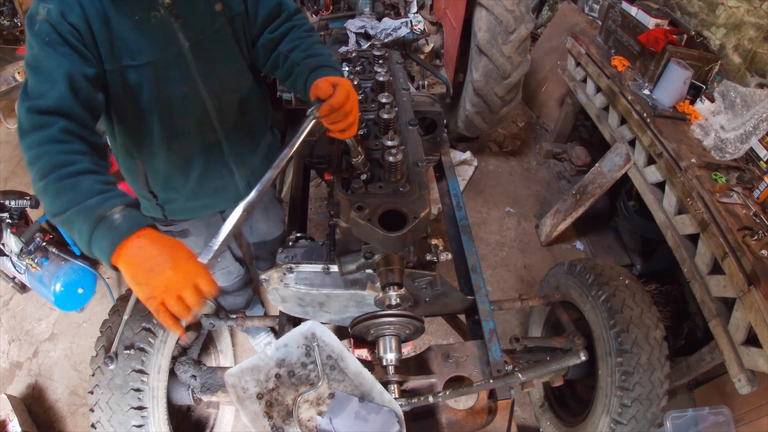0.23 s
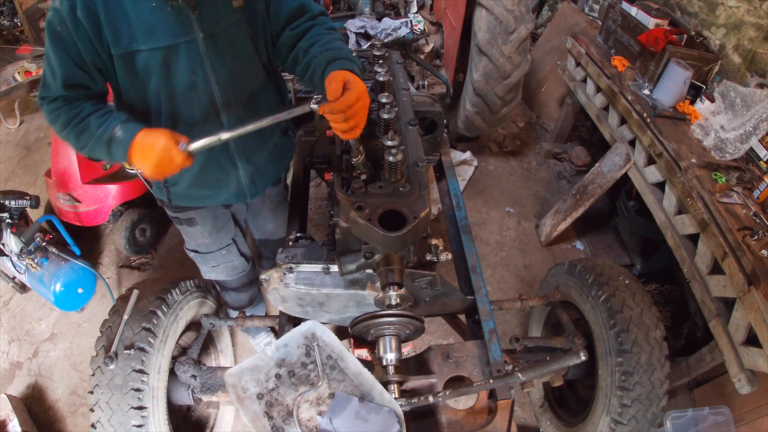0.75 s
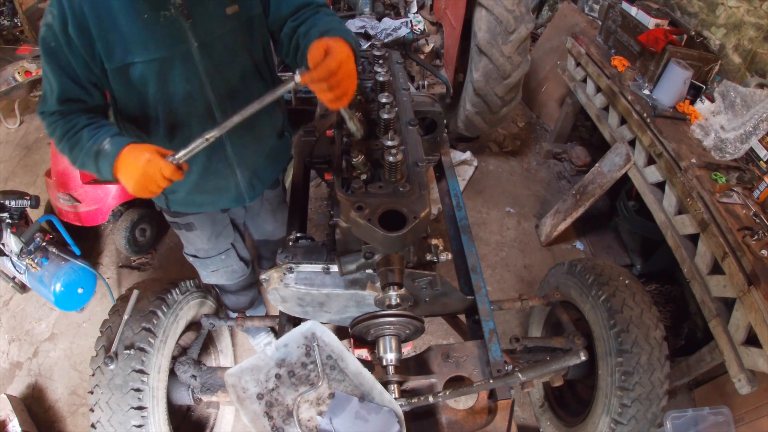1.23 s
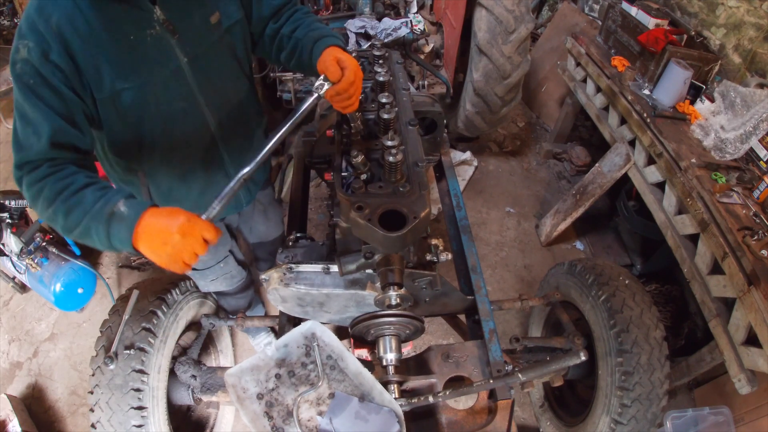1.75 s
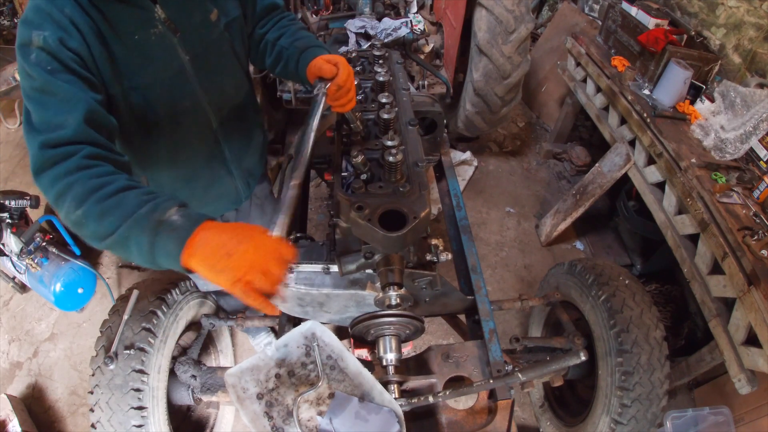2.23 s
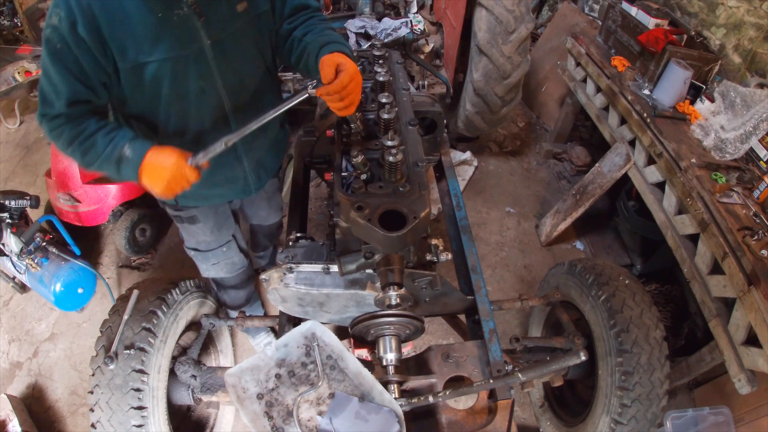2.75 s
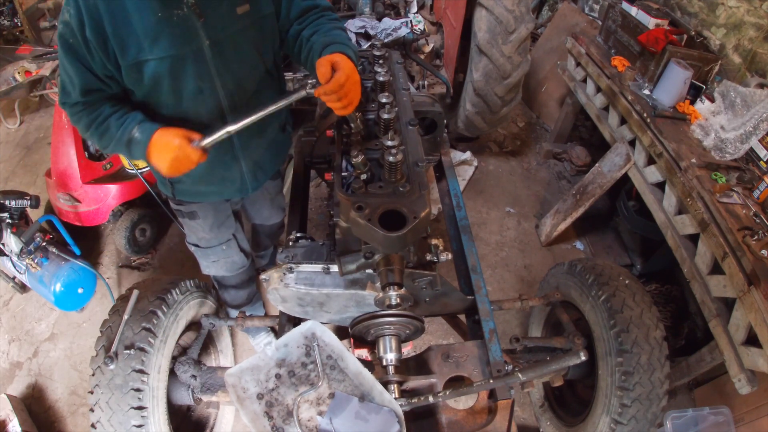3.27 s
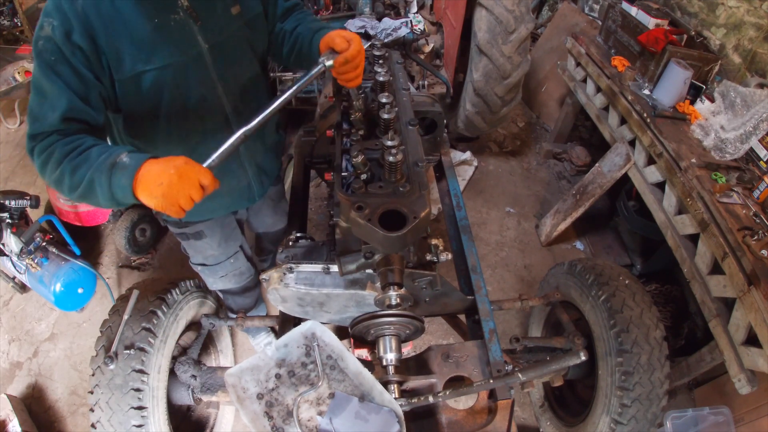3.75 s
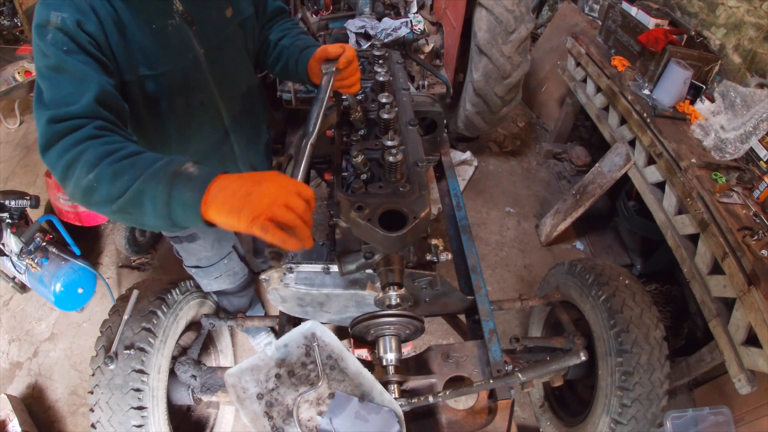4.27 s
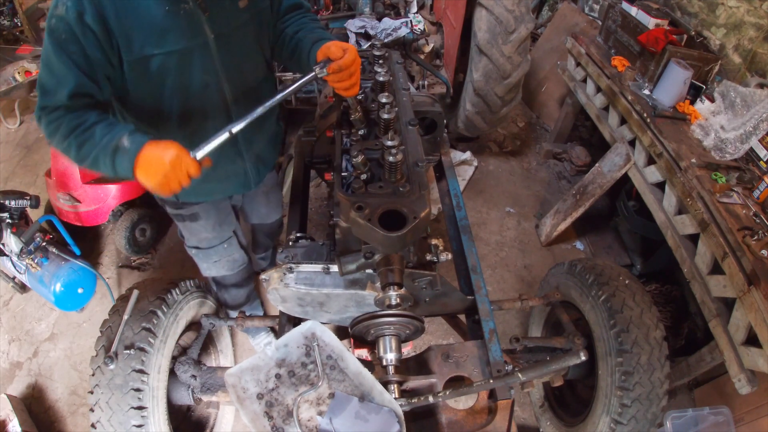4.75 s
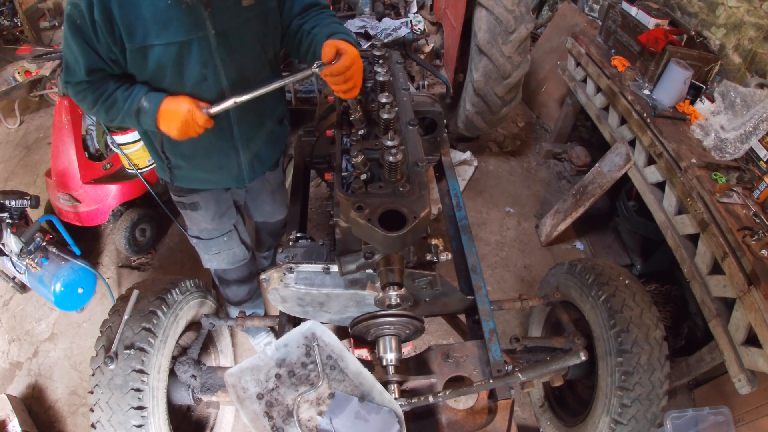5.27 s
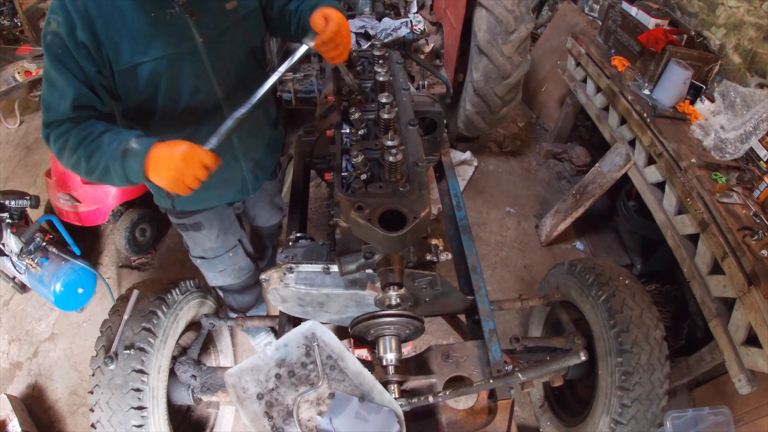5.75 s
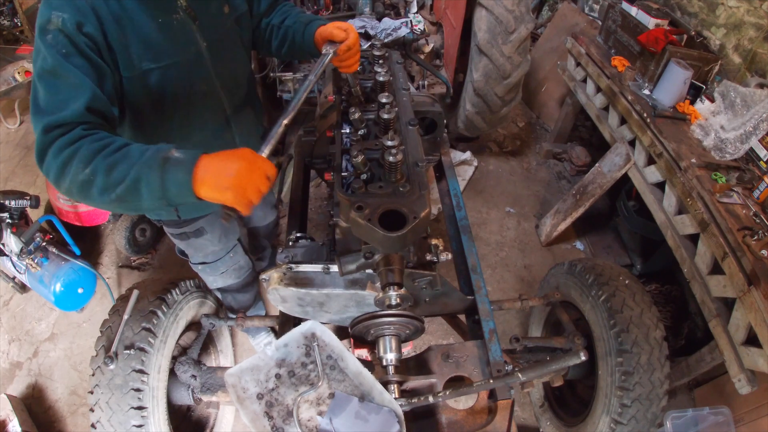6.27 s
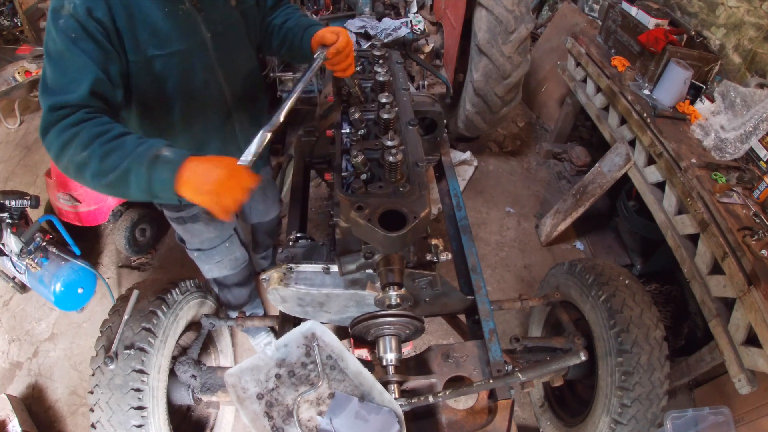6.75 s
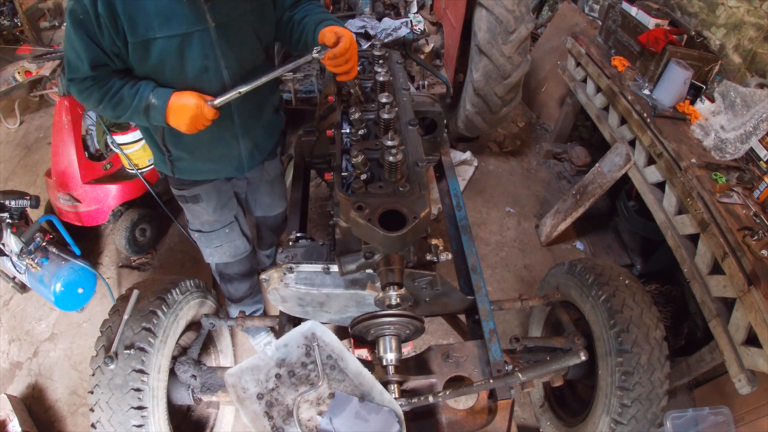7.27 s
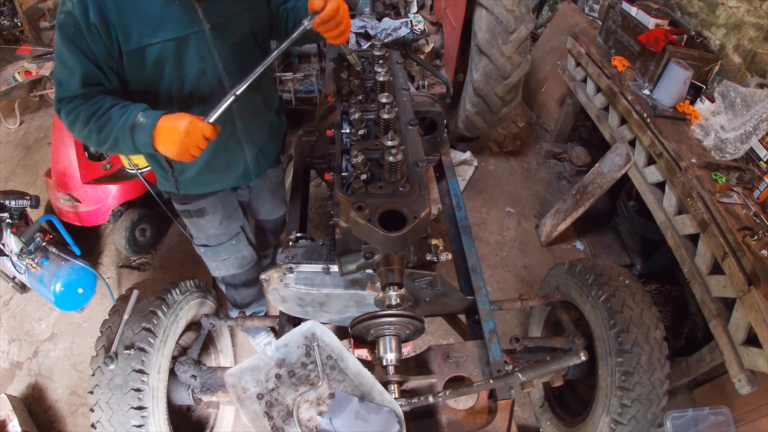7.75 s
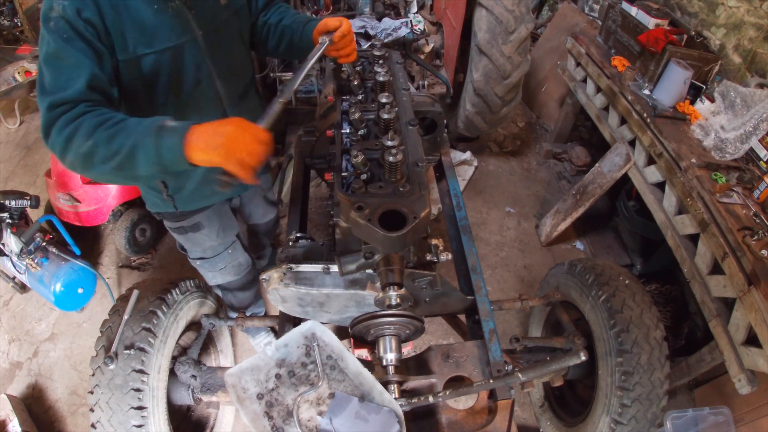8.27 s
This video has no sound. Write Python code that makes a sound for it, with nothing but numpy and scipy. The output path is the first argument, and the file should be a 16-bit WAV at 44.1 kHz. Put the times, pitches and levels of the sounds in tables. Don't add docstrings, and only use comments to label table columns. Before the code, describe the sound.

A ratcheting torque wrench on engine nuts gives hard, irregular steel clicks with short rings and low thumps, over faint shed air and occasional birdsong.

```python
import sys
import numpy as np
from scipy import signal
from scipy.io import wavfile
from scipy.ndimage import uniform_filter1d

SR = 44100
rng = np.random.default_rng(int(sys.argv[2]) if len(sys.argv) > 2 else 0)


def nominal_scale(level):
    x = np.asarray(level, float) / 20
    return 10 ** x


def pcm_store(signal):
    levels = np.round(np.clip(np.atleast_2d(signal), -1, 1) * 32767)
    wavfile.write(sys.argv[1], SR, levels.astype(np.int16).T)


N = 375320


def fade(t, t60):
    return np.exp(-np.log(1000) * np.maximum(t, 0) / t60) * (t >= 0)


def band(x, low_hz, high_hz):
    sos = signal.butter(3, [low_hz, high_hz], "band", fs=SR, output="sos")
    return signal.sosfilt(sos, x) * np.sqrt(SR / 2 / (high_hz - low_hz))


def add(out, start_s, x):
    i = max(int(start_s * SR), 0)
    out[i:i + len(x)] += x[:N - i]


def walk(rate_hz, size=N, sr=SR):
    hold = int(sr / rate_hz)
    steps = np.repeat(rng.standard_normal(size // hold + 1), hold)
    return 1.5 * uniform_filter1d(uniform_filter1d(steps, hold), hold)[:size]


def rough_ring(t, hz, t60, width):
    waver = band(rng.standard_normal(np.shape(hz * t)), 5.8, 60 + width * np.mean(hz))
    return fade(t, t60) * (.5 + waver) * np.sin(2 * np.pi * hz * t)


# start in seconds, 2-5 kHz peak in dB,
# low band in dB re peak, high band in dB re peak, tail in dB re crack.
CLICKS = [(0.0, -19.5, -29, -10.5, -5), (1.6159, -20.5, -14.5, -17, -3), (1.7764, -10.5, -12.5, -1, -9),
          (1.9985, -8, -8.5, 0.4, -7.5), (2.1243, -25.5, -21, -8, -13), (2.157, -9, -31, -12, -16),
          (3.8924, -10, -12, -13, -8), (4.0088, -0.5, -12, -9, -14), (4.14, -10, -6, -1.5, -13),
          (5.8995, -14.5, -4, -14.5, -11), (5.9138, -19.5, -2.5, -19, -16),
          (5.9752, -11.5, -18.5, -10.5, -9), (6.2051, -15, -10.5, -7, -8), (6.2841, -19, -13, -33, -10.5),
          (6.2921, -18, -2.5, -18, -13), (6.518, -26.5, -28, -10, -11), (6.5949, -7.5, -28.5, -14, -14.5),
          (8.08, -24.5, -8, -23, -4.5), (8.1576, -15, -16.5, -16, -4), (8.164, -10, -14.5, -6, -12.5),
          (8.2602, -22, -13, -11, -9), (8.2745, -12.5, -7, -0.5, -11), (8.4467, -5, -28, -13.5, -14.5)]
# start in seconds, peak in dB, low band in dB re peak,
# high band in dB re peak, tail in dB.
SCRAPES = [(0.065, -19, -12, -14, -18), (0.0812, -11, -7, -9.5, -16.5), (0.595, -33.5, -14.5, -15, -4.5),
           (1.129, -23, -14, -11, -7), (2.3544, -31, -12, -17, -25), (3.2695, -22, -9, -5.5, -6.5),
           (3.3288, -33, -2.5, -18, -8), (4.3136, -47, 5, -12, -11), (4.5291, -25.5, -7, -26, -15),
           (5.4505, -23, -7.5, -13, -10.5), (6.131, -30.5, 4, -15, -9), (6.4203, -29, -7, -20, -8),
           (6.4394, -32, 3.5, -16, -11.5), (6.7585, -27, -4, -13.5, -12.5), (7.5587, -25, -8, -8.5, -8),
           (8.3294, -33, -1, -10, -12), (8.3913, -28.5, -3, -15, -10)]
# start in seconds, peak in dB.
TICKS = [
    (0.2528, -39.5),
    (2.368, -40),
    (4.362, -41),
    (4.436, -45),
    (6.1445, -34),
    (6.402, -33),
    (6.697, -40),
    (8.433, -29),
]
# start in seconds, peak in dB.
BRUSHES = [
    (0.3494, -41),
    (0.8344, -45),
    (1.2844, -45),
    (5.5594, -45),
    (7.0494, -43),
    (7.5158, -43),
    (8.0394, -48),
]


def contacts():
    clicks = [(*row, .004) for row in CLICKS]
    scrapes = [(*row, .003 - .0006 * row[1]) for row in SCRAPES]
    ticks = [(*row, -6, -13, -7, .004) for row in TICKS]
    brushes = [(*row, -7, -3, -9, .028) for row in BRUSHES]
    return clicks + scrapes + ticks + brushes


# frequency in Hz, level in dB.
STEEL = [(800, -5), (1350, 15), (1600, 5.5), (2330, 6), (2900, 3), (3470, -0.5), (3750, -2), (4250, -15),
         (5050, 6), (5600, 1), (6400, -8), (7200, 4), (8600, 4.5), (9200, 7.5)]
# low edge in Hz, high edge in Hz, t60 in seconds, level in dB.
SHED_BANDS = [(380, 1000, 0.55, -3.5), (1030, 1980, 0.41, 3.5), (1890, 4610, 0.29, -3),
              (5130, 9440, 0.26, 0), (10200, 14800, 0.2, -5)]


def strikes():
    out, t = np.zeros(N), np.arange(SR // 3) / SR
    mode_hz, mode_db = np.transpose(STEEL)
    steel = rough_ring(np.arange(SR) / SR, mode_hz[:, None], np.inf, .041)
    starts_s, peaks_db, low_db, high_db, tail_db, scrape_s = np.transpose(contacts())[:, :, None]
    scrape_s = np.maximum(scrape_s, .001)
    hardness = np.clip(.006 / scrape_s, 0, 1)

    impact = 2.4 * fade(t, .008) * (1 - fade(t, .004)) + .55 * fade(t, .025)
    floor_bounce = .45 * fade(t - .0085, .02)
    crack = hardness * (impact + floor_bounce)
    chance = rng.random(crack.shape) * SR / 300
    grains = (chance < 1) * chance * 1.3 * fade(t, 5 * scrape_s)
    blows = crack + signal.lfilter([1], [1, -.985], grains)
    build = (1 - fade(t, .0099 + scrape_s)) * np.cos(np.pi / 2 * t / t[-1]) * nominal_scale(tail_db)

    bursts, noise = 0, rng.standard_normal(crack.shape)
    for (low_hz, high_hz, t60, band_db), share_db in zip(SHED_BANDS, (low_db, low_db, 0, high_db, high_db)):
        tail = fade(t, t60 + 2 * scrape_s) * build
        shape = min(low_hz / 900, 1) * blows + tail
        bursts = bursts + nominal_scale(share_db + band_db - 6.5) * band(shape * noise, low_hz, high_hz)

    luck_db = 4 * np.clip(rng.standard_normal((len(peaks_db), len(STEEL))), -2, 1.3)
    low_tilt_db = low_db * np.interp(mode_hz, [1200, 3500], [1, 0])
    high_tilt_db = high_db * np.interp(mode_hz, [3500, 7500], [0, 1])
    gains = hardness * nominal_scale(low_tilt_db + high_tilt_db + mode_db + luck_db + tail_db - 17.5)
    offsets = rng.integers(SR // 2, size=len(peaks_db))
    for start_s, peak_db, burst, gain, k in zip(starts_s[:, 0], peaks_db, bursts, gains, offsets):
        ring = gain @ steel[:, k:k + len(t)] * fade(t, .21)
        add(out, start_s, nominal_scale(peak_db) * (burst + ring))
    return out


# (start in seconds, level in dB).
RINGS = [(560, .15, [(.08, -36)]), (1335, .22, [(1.781, -29), (2.0, -30.5), (5.902, -20.5), (6.206, -32.5),
         (6.292, -35), (6.441, -40), (8.275, -31)]), (1520, .2, [(4.009, -14)]), (2020, .09, [(.085, -28),
         (8.166, -24)]), (2800, .1, [(0, -32), (6.595, -29)]), (3290, .05, [(2.123, -24)]),
         (3740, .16, [(3.891, -21), (5.976, -24.5)]), (4350, .07, [(0, -32), (2.124, -25.5), (5.451, -43)]),
         (5050, .22, [(3.893, -19), (4.009, -26)]), (5650, .23, [(3.895, -20), (4.009, -27)]),
         (6250, .16, [(8.167, -27), (8.273, -26)]), (6970, .25, [(1.777, -27.5), (3.27, -45.5),
         (6.293, -45)]), (7550, .2, [(2.0, -30), (2.16, -38), (3.893, -36), (6.595, -36), (8.446, -30)]),
         (8850, .17, [(1.62, -41), (1.778, -29), (1.999, -22), (4.139, -31.5), (5.974, -21)])]


def singing_parts():
    out, t = np.zeros(N), np.arange(SR // 3) / SR
    for hz, t60, blows in RINGS:
        rings = rough_ring(t, np.full((len(blows), 1), hz), t60, .016 + .001 / t60)
        for (start_s, db), ring in zip(blows, rings):
            add(out, start_s, nominal_scale(db + 1.2) * ring)
    return out


# start in seconds, 90 Hz sway peak in dB, deep sway in dB re peak, panel modes in dB re peak.
JOLTS = [(0.0, -36, -16, -7), (0.059, -13.5, -17, -14.5), (0.089, -9, -12.5, -12.5),
         (0.309, -33, -3.5, -26), (1.128, -39.5, -7.5, -6.5), (1.626, -28.5, -8, -6.5),
         (1.79, -25.5, -16, -4.5), (2.005, -9.5, -25, -11.5), (2.039, -9, -18, -18), (2.109, -19, -29, -17),
         (2.387, -38, 6, -6), (3.27, -21, -13, -14), (3.378, -29, -12, -9), (3.905, -30.5, -6, -2.5),
         (4.02, -28.5, -12, -4.5), (4.139, -21, -9, -10), (4.198, -31, 1, -10), (4.378, -35.5, -4, -6),
         (4.529, -26.5, -2.5, -8.5), (4.649, -34.5, -13, -9), (5.453, -34.5, -14, -8),
         (5.995, -25, -19, -20), (6.129, -30.5, -19, -10), (6.307, -23, -19, -12), (6.41, -33, -6.5, -21),
         (6.778, -32.5, 7, -11), (7.57, -35.5, -13, -5.5), (8.169, -29.5, -11, -4), (8.288, -28, -10, -4.5),
         (6.61, -38, -1, -10)]
# frequency in Hz, level in dB, t60 in seconds, group (0 sway, 1 deep, 2 panel).
FRAME = [(44, 8, 0.41, 1), (60.05, 7, 0.52, 1), (83.5, -7, 0.42, 0), (91.14, 2.5, 0.5, 0),
         (101.6, -10.5, 0.29, 0), (157.3, 2, 0.43, 2), (207.4, -4.5, 0.35, 2), (288.7, -2, 0.22, 2),
         (400, -14, .2, 2), (530, -14, .2, 2)]


def frame():
    out, t = np.zeros(N), np.arange(SR * 5 // 9) / SR
    hz, mode_db, t60, group = np.transpose(FRAME)
    choke = np.exp(-(t / .4) ** 2)
    decay = fade(t, t60[:, None]) * (1 - fade(t, .042)) * choke
    for start_s, db, deep_db, panel_db in JOLTS:
        detune = 1 + .008 * rng.standard_normal(len(FRAME))
        group_db = np.array([0, deep_db, panel_db])[group.astype(int)]
        gain = nominal_scale(db - 1.5 + mode_db + group_db)
        add(out, start_s, -gain @ (decay * np.sin(2 * np.pi * np.outer(hz * detune, t))))
    return out


def stir(t, weight, lift_db, t60):
    power = 0
    for start_s, db, low_db, *_ in CLICKS + SCRAPES:
        swell = fade(t - start_s, t60) ** 2 * (1 - fade(t - start_s, .06))
        power = power + nominal_scale(db + weight * low_db + lift_db) ** 2 * swell
    return 10 * np.log10(1 + power)


# frequency in Hz, level in dB per Hz.
AIR = [(15, -41), (25, 5), (91, -14), (113, -26), (147, 1), (244, -3), (472, -15.5), (741, -9),
       (940, -13.5), (2250, -17.5), (4250, -24.5), (6670, -16.5), (9170, -32.5), (12600, -53.5),
       (14000, -70)]
# time in seconds, level in dB re rest.
EFFORT = [(0, 4), (.5, 6), (.9, -1.5), (1.59, -2), (2.2, -2), (2.4, 3), (2.6, 1), (3.0, 3), (3.25, 9),
          (3.45, -1), (4.3, -2), (4.6, 4), (5.12, -1.5), (5.4, 2), (5.6, 8), (5.9, 3), (6.9, 0), (8.13, 5)]
REST_DB = [-6.5, -3, -4.5]
EFFORT_SHARES = [.2, 1.01, .7]
STIR_DB = [39, 24, 14]
STIR_T60_S = [.8, .6, .9]


def air():
    control_s = np.arange(0, N / SR, .005)
    effort_db = np.interp(control_s, *np.transpose(EFFORT))
    layers = zip(REST_DB, EFFORT_SHARES, (1, 1, 0), STIR_DB, STIR_T60_S)
    layers_db = np.array([rest_db + share * effort_db + stir(control_s, weight, lift_db, t60)
                          for rest_db, share, weight, lift_db, t60 in layers])
    hz, db = np.transpose(AIR)
    centres_hz = 30 * 2 ** np.arange(0, 9, .5)
    weights = nominal_scale(np.interp(np.log(centres_hz), np.log(hz), db)) * np.sqrt(centres_hz)
    weights = weights / np.sqrt(np.sum(weights ** 2))
    layer_shares = [1, 0, 0, 0], [0, 1, 1, 0], [0, 0, 0, .5]
    out, t, noises = 0, np.arange(N) / SR, rng.standard_normal((3, N))
    for k, (centre_hz, weight) in enumerate(zip(centres_hz, weights)):
        mix = [np.interp(np.log2(centre_hz / 300), [0, 1.5, 3, 4], row) for row in layer_shares]
        gust = nominal_scale(mix @ layers_db + 1.02 * walk(6.6, size=len(control_s), sr=200))
        noise = band(noises[k % 2], centre_hz / 2 ** .25, centre_hz * 2 ** .25)
        out = out + weight * np.interp(t, control_s, gust) * noise
    return out * nominal_scale(-50) + nominal_scale(-62.5) * band(noises[-1], 10310, 12400)


def insect():
    cycle = np.cumsum(25.2 * (1 + .05 * walk(9))) / SR % 1
    pulses = np.exp(-((cycle - .5) / .12) ** 2)
    puffs = nominal_scale(3.5 * walk(25)) * pulses * rng.standard_normal(N)
    return nominal_scale(-66) * band(puffs, 6300, 7500) + nominal_scale(-63) * band(puffs, 4800, 9600)


# time in seconds, level in dB.
DRONE = [
    (.3, -73),
    (.5, -59.5),
    (.7, -51),
    (.95, -69),
]


def drone():
    s, db = np.transpose(DRONE)
    level_db = np.interp(np.arange(N) / SR, s, db, left=-120, right=-120)
    return nominal_scale(level_db) * band(rng.standard_normal(N), 227, 310)


def whistle(shape, calls, second_hz, second_follows, second_db, echo_t60):
    out, flutter = np.zeros(N), walk(330)
    s, hz, db = np.transpose(shape)

    def voice(pitch_hz, wobble):
        return np.sin(2 * np.pi * np.cumsum(pitch_hz * (1 + wobble)) / SR)

    for start_s, call_db, stretch in calls:
        t = np.arange(0, s[-1], 1 / SR / stretch)
        waver = flutter[int(start_s * SR):][:len(t)]
        first_hz = np.interp(t, s, hz)
        upper_hz = second_hz + second_follows * (first_hz - hz[0])
        tone = voice(first_hz, .013 * waver[::-1]) + nominal_scale(second_db) * voice(upper_hz, .02 * waver)
        level = nominal_scale(np.interp(t, s, db) + call_db + 3.1 * waver)
        add(out, start_s, tone * level * signal.windows.tukey(len(t), .1))
    t = np.arange(SR // 3) / SR
    echoes = rng.standard_normal(len(t)) * fade(t - .005, echo_t60)
    echoes[0] = 3.5
    return signal.fftconvolve(out, echoes / np.sqrt(np.sum(echoes ** 2)))[:N] * nominal_scale(4.5)


# time from start in seconds, lower pitch in Hz, level in dB.
GLIDE = [(0, 5760, -11), (.03, 5470, -4), (.07, 5210, -.6), (.12, 4950, -2.5), (.155, 4790, -9),
         (.185, 4740, -20)]
SEEP = [(0, 7980, -10), (.06, 7780, -6), (.15, 7590, -4), (.25, 7540, -1), (.33, 7520, -12)]
# start in seconds, level in dB, stretch.
GLIDES = [
    (1.828, -48, 1.01),
    (3.577, -47, 1.01),
    (5.668, -46, 1.01),
    (7.104, -47, .88),
]
SEEPS = [
    (4.315, -53.5, 1.01),
    (7.275, -55.5, 1.3),
]


def birds():
    return whistle(GLIDE, GLIDES, 6170, .88, -4, .2) + whistle(SEEP, SEEPS, 8080, .15, -4, .25)


def scene():
    mono = strikes() + singing_parts() + frame() + air() + insect() + drone() + birds()
    return np.array([mono, mono])


def follow(x, attack_s, release_s, size=32):
    level, out = 0., []
    for peak in np.abs(x[:N // size * size]).reshape(-1, size).max(axis=1):
        time_s = attack_s if peak > level else release_s
        level += (peak - level) * (1 - np.exp(-size / SR / time_s))
        out.append(level)
    return np.interp(np.arange(N), (np.arange(len(out)) + 1) * size, out)


def low_pass(x):
    return signal.sosfilt(signal.butter(12, 16340, fs=SR, output="sos"), x)


def record(dry):
    dry = signal.sosfilt(signal.butter(2, 32, "high", fs=SR, output="sos"), dry)
    body = signal.sosfiltfilt(signal.butter(10, 10100, fs=SR, output="sos"), dry)
    dry = body + nominal_scale(-21) * (dry - body)
    level = .75 * follow(dry[0], attack_s=.0025, release_s=.25)
    gain = np.minimum(nominal_scale(-7) / (level + 1e-9), 1) ** .39
    wet = np.clip(dry * gain, -.87, .87)
    top = signal.sosfilt(signal.butter(10, 12500, "high", fs=SR, output="sos"), wet[0])
    side = (.55 + .6 * walk(30)) * top
    wet = wet + side * np.array([[1], [-1]])
    wet = signal.sosfilt(signal.ellip(8, .2, 70, 16000, fs=SR, output="sos"), wet)
    return low_pass(wet)


dry = scene()
out = record(dry)
pcm_store(out)
```